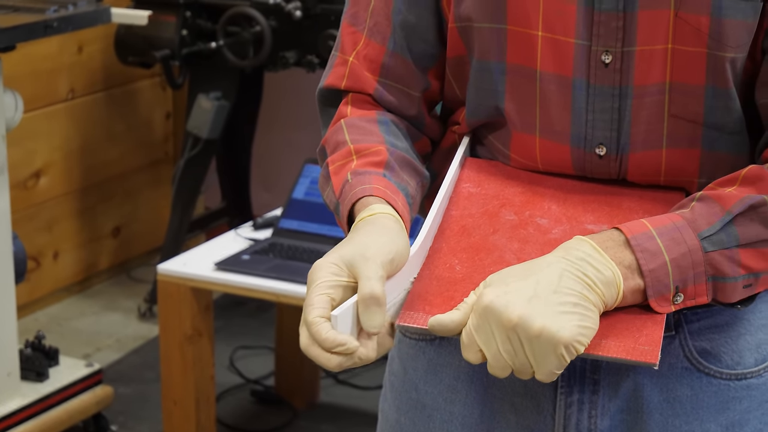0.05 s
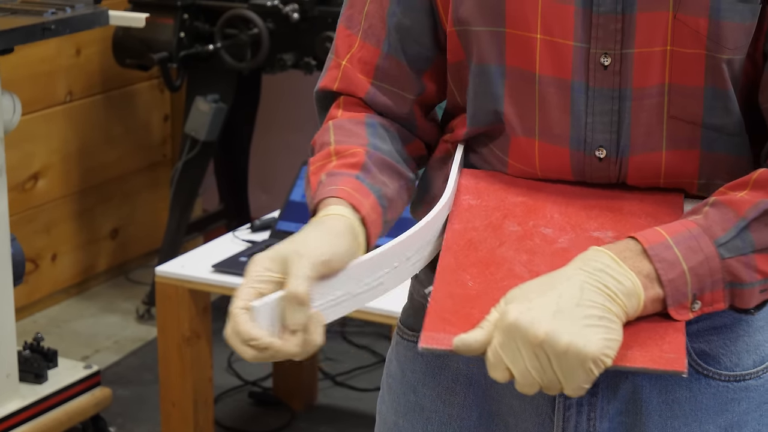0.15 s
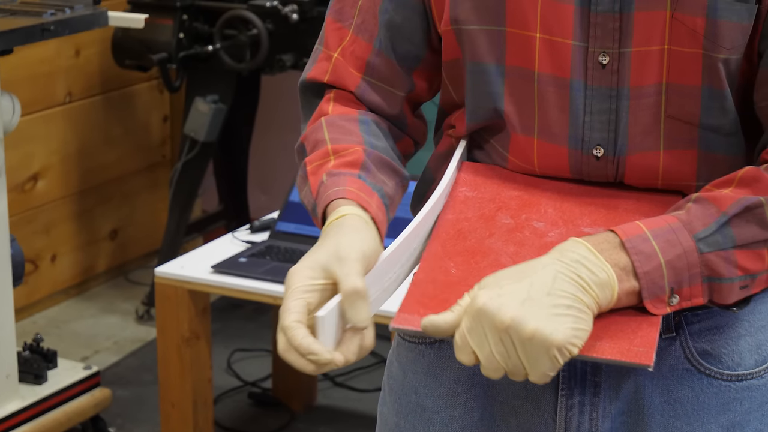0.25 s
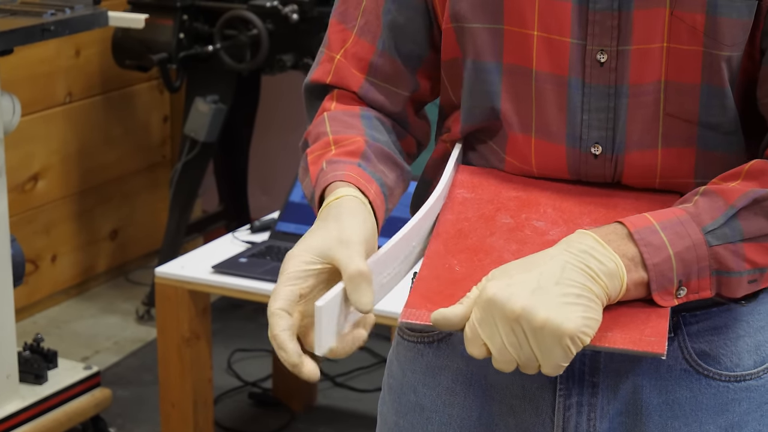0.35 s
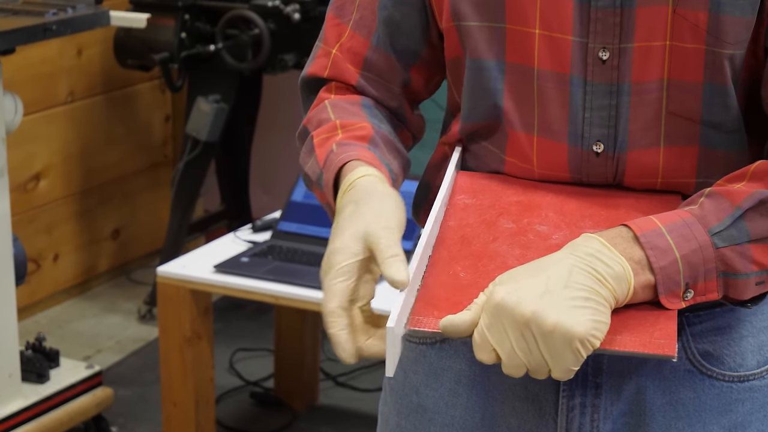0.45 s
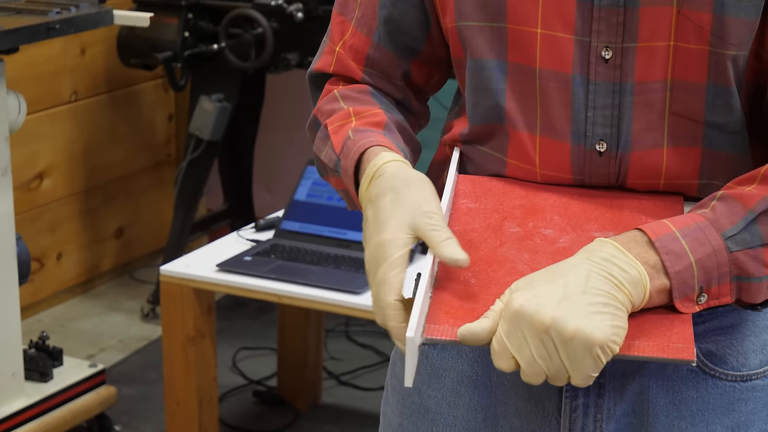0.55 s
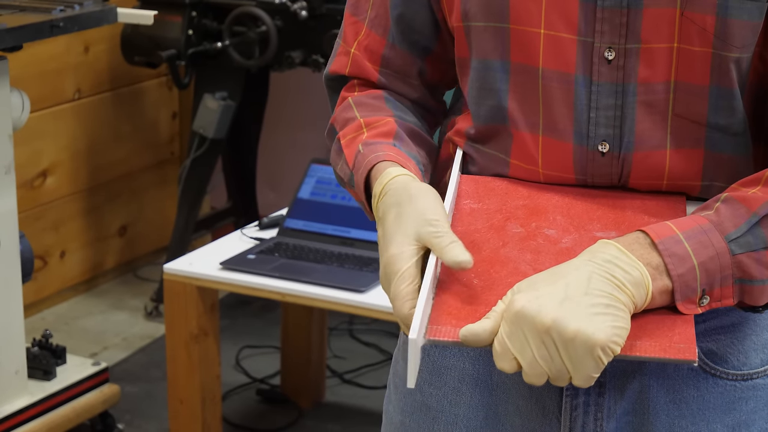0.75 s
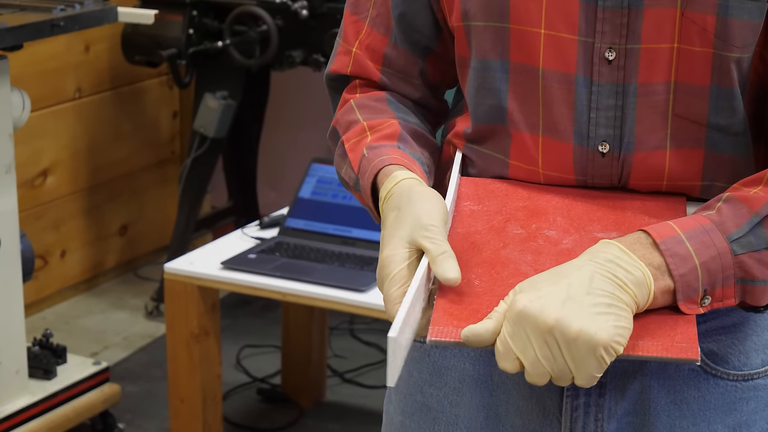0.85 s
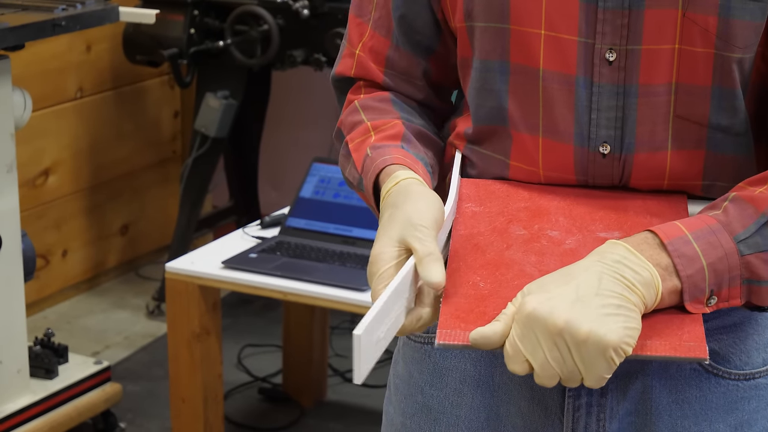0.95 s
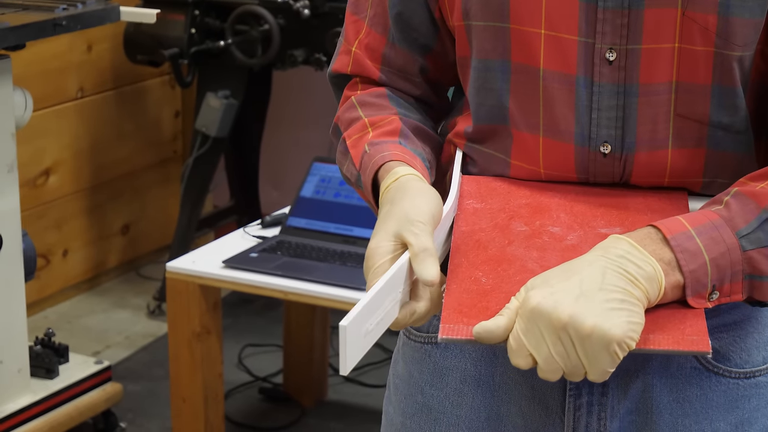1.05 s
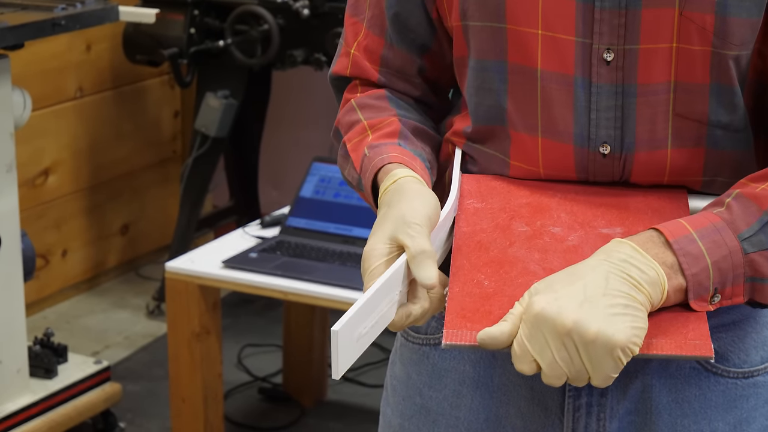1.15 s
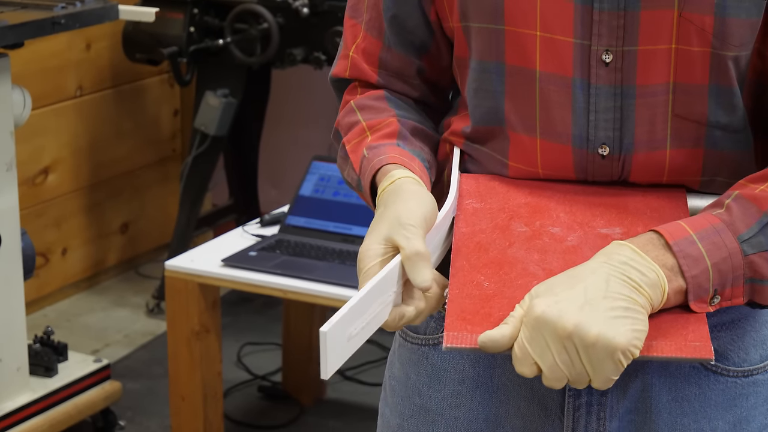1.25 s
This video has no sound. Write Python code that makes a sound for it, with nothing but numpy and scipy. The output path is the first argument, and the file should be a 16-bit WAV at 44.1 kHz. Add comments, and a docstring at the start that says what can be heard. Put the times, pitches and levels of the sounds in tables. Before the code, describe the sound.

A brittle plastic snap: hardened glue crackles, then breaks loudly from a stiff panel, close up.

```python
"""In a small workshop, a plastic strip is bent away from a cured resin panel, close to the microphone.
The hot glue between them crackles, then lets go in a volley of snaps that overload the recorder.
The snaps are short noise bursts with falling chirps, and they ring the panel as dying, wavering tones.
The strip rubs (grains of noise) and ticks (small bursts) on the panel, faintly before the snaps and more
after; soft knocks (dying sines) follow them. Room echoes, faint air and a low rumble surround it all."""
import sys
import numpy as np
from scipy import signal
from scipy.fft import rfft, irfft
from scipy.io import wavfile

SR = 44100
rng = np.random.default_rng(int(sys.argv[2]) if len(sys.argv) > 2 else 0)


def digitize_waveform(pressure):
    """Quantize a signal to 16-bit integers and store it at the path in sys.argv[1].

    Rows of a 2-D input are taken as channels; values are limited to [-1, 1].
    """
    field = np.atleast_2d(pressure).T
    bounded = np.clip(field, -1, 1)
    quanta = np.round(bounded * 32767).astype(np.int16)
    wavfile.write(sys.argv[1], SR, quanta)


N = 57330  # length in samples, 1.3 s


def amp(db):
    """Turns decibels into a gain."""
    return 10 ** (np.asarray(db) / 20)


def unit(x):
    """Scales a sound to an rms of 1."""
    return x / np.sqrt(np.mean(x ** 2) + 1e-20)


def read(points, hz):
    """Reads a table of (pitch, value) between its points, along log frequency."""
    table_hz, value = np.transpose(points)
    return np.interp(np.log(hz + 1), np.log(table_hz + 1), value)


def add(mix, start_s, sound):
    """Mixes a sound in at its start time, cutting off what runs past the end."""
    part = mix[max(round(start_s * SR), 0):][:len(sound)]
    part += sound[:len(part)]


def colour(x, points, size=4096):
    """Gives a sound the table's tone colour, with a filter of unit energy that never sounds early."""
    log_gain = np.log(amp(read(points, abs(np.fft.fftfreq(size, 1 / SR)))))
    # the phase that puts the energy as early as possible
    spectrum = np.exp(np.conj(signal.hilbert(log_gain)))
    taps = np.fft.ifft(spectrum).real[:size // 2]
    return signal.fftconvolve(x, taps / np.linalg.norm(taps))[:len(x)]


def noise(points):
    """Makes steady noise of rms 1 with the table's tone colour."""
    gain = amp(read(points, np.fft.rfftfreq(N, 1 / SR)))
    return unit(irfft(rfft(rng.standard_normal(N)) * gain, N))


def drift(limit_hz=22):
    """Makes a slow random wander of rms 1, with little above the limit."""
    smoothing = np.exp(-(np.fft.rfftfreq(N, 1 / SR) / limit_hz) ** 2)
    return unit(irfft(rfft(rng.standard_normal(N)) * smoothing, N))


def burst(decay_s, size=1024, count=4):
    """Makes a quickly dying burst of noise with a nearly even spectrum."""
    fade = np.exp(-np.arange(size) / SR / decay_s)
    x = rng.standard_normal(size) * fade
    # flatten the spectrum, then quieten the end again
    for _ in range(count):
        z = rfft(x)
        x = irfft(z / (abs(z) + 1e-12)) * np.minimum(2 * np.sqrt(fade), 1)
    # as much energy as 3 ms of sound at rms 1
    return x / np.linalg.norm(x) * np.sqrt(.003 * SR)


SCATTER_DB, SCATTER_DECAY_S = -15, .007  # scatter level compared with its click


def clicks(table, shapes):
    """Each click mixes body, edge and fizz, plus its own quick scatter off hands and clothes."""
    parts = np.zeros((3, N))
    for start_s, decay_s, *levels_db in table:
        for part, level_db in zip(parts, levels_db):
            add(part, start_s, amp(level_db) * burst(decay_s))
            add(part, start_s, amp(level_db + SCATTER_DB) * burst(SCATTER_DECAY_S, size=2048))
    return sum(colour(part, shape) for part, shape in zip(parts, shapes))


def ring(modes):
    """Adds up half a second of dying sines; each falls by 60 dB in its t60."""
    t = np.arange(SR // 2) / SR
    out = np.zeros(len(t))
    for pitch_hz, level_db, t60_s in modes:
        fade = np.exp(-np.log(1000) * t / t60_s)
        out += amp(level_db) * fade * np.sin(2 * np.pi * pitch_hz * t)
    return out


# tone colour of the still air: pitch_hz, relative_db (per Hz)
AIR_COLOUR = [(20, 3), (100, 1), (400, -3.5), (1000, -7.5), (3000, -11.5), (8000, -15), (16000, -18)]
# tone colour of the low rumble: pitch_hz, relative_db (per Hz)
RUMBLE_COLOUR = [(8, -4.5), (25, 9), (40, -0.5), (70, -10), (150, -33), (600, -69.5)]
# how the rumble swells and sinks: time_s, level_db
RUMBLE_LEVEL = [(0, -61), (.4, -52), (.8, -62), (1.0, -57), (1.12, -49), (1.3, -63)]
AIR_DB = -63.5


def background():
    """Faint room air is steady noise, over low noise whose level slowly swells and sinks."""
    rumble_db = np.interp(np.arange(N) / SR, *np.transpose(RUMBLE_LEVEL))
    return amp(AIR_DB) * noise(AIR_COLOUR) + amp(rumble_db) * noise(RUMBLE_COLOUR)


# strokes of the strip along the edge: peak_s, rise_s, fall_s, hollow_db, scrape_db, fizz_db
STROKES = [(.005, .02, 0.056, -66, -57.5, -65), (0.452, 0.062, 0.041, -55, -50, -65),
           (0.553, 0.028, 0.02, -49, -45, -47), (.628, 0.023, .02, -59, -58, -54.5),
           (.702, 0.01087, .05, -64, -65, -75), (0.782, 0.0037, .015, -54, -66.5, -79),
           (0.826, 0.028, 0.055, -56.5, -58.5, -61.5), (.92, 0.036, 0.031, -68, -75, -74),
           (0.974, 0.019, 0.037, -61, -66, -71), (1.012, .014, 0.0088, -50.5, -70, -58),
           (1.11, .04, 0.039, -64, -77, -72)]
# tone colour of the hollow part of a rub: pitch_hz, relative_db
RUB_HOLLOW = [(60, -10), (150, 3.5), (330, 3), (600, 1), (1000, -5.5), (1600, -16.5), (6000, -40.5)]
# tone colour of the scraping part: pitch_hz, relative_db
RUB_SCRAPE = [(60, -22.5), (600, -12.5), (1200, -0.5), (2600, 4), (3300, -5), (4600, -2.5), (6000, -16.5),
              (15000, -30.5)]
# tone colour of the fizzing part: pitch_hz, relative_db
RUB_FIZZ = [(60, -38), (4000, -20), (6000, -2.5), (8500, -4.5), (10000, 2), (15500, 1.5)]
GRAINS_PER_S, GRAIN_SPREAD_DB = 11000, 3  # how many slips, and how unequal they are


def rubs():
    """Each stroke is made of dense tiny slips, grains of noise that swell and fade together."""
    t, out = np.arange(N) / SR, np.zeros(N)
    grains = rng.standard_normal((3, N))
    strength = amp(GRAIN_SPREAD_DB * np.minimum(rng.exponential(1, N), 4))
    slip_happens = rng.random(N) < GRAINS_PER_S / SR
    slips = grains * strength * slip_happens
    shapes = (RUB_HOLLOW, RUB_SCRAPE, RUB_FIZZ)
    parts = np.array([unit(colour(x, shape)) for x, shape in zip(slips, shapes)])
    for peak_s, rise_s, fall_s, *levels_db in STROKES:
        before = ((peak_s - t) / rise_s) ** 2
        after = (t - peak_s) / fall_s
        stroke = np.exp(-np.where(t < peak_s, before, after))
        out += stroke * (amp(levels_db) @ parts)
    return out


# the strip ticks on the panel: start_s, decay_s, body_db, edge_db, fizz_db
TICKS = [(.007, 0.0018, -51.5, -78, -57), (.449, 0.0009, -65.5, -47, -49), (.485, 0.0037, -51.5, -60, -48),
         (.5008, 0.0012, -54, -51, -52), (.5318, 0.00043, -53, -62, -60), (.546, 0.00095, -43.5, -70, -63),
         (.5568, 0.0016, -58, -47.5, -65), (.5628, 0.0019, -40, -48, -68), (.781, 0.00091, -64.5, -66, -65),
         (.8903, 0.0012, -74, -55.5, -59), (.9883, 0.00035, -48.5, -41.5, -43.5),
         (1.0068, 0.0022, -53.5, -52, -53), (1.011, 0.0026, -45.5, -50.5, -48),
         (1.027, 0.0036, -65, -55, -56)]
# tone colour of a click's low body: pitch_hz, relative_db
BODY = [(30, -20.5), (150, -4.5), (400, -4), (800, 0.5), (1450, 0.5), (2200, -1.5), (3000, -17),
        (6000, -42)]
# tone colour of the edge of a strip tick: pitch_hz, relative_db
STRIP_EDGE = [(30, -56.5), (1300, -22), (2000, -4.5), (2450, 4.5), (3300, -7), (4000, 0), (5200, -11),
              (9000, -35.5)]
# tone colour of a click's high fizz: pitch_hz, relative_db
FIZZ = [(30, -44.5), (3500, -23.5), (5500, 0), (8000, -1.5), (10500, -0.5), (13500, -3), (16000, -4.5)]


def ticks():
    """The strip ticks on the panel in small clicks, each a short burst of coloured noise."""
    return clicks(TICKS, (BODY, STRIP_EDGE, FIZZ))


# the glue breaks: start_s, decay_s, body_db, edge_db, fizz_db
CRACKS = [(.0772, .0004, -62.5, -61, -57), (.1107, .0016, -52.5, -41, -41.5),
          (.1284, .0009, -31.5, -40, -46.5), (.1348, .0012, -36, -37, -40), (.1556, .001, -47.5, -46, -43),
          (.1632, .001, -38, -41.5, -46), (.1784, .0008, -36.5, -39, -31), (.1859, .001, -39.5, -40.5, -34),
          (.1893, .001, -46, -39, -43), (.1924, .0015, -41, -44, -36.5), (.1955, .0012, -31.5, -36.5, -40),
          (.2037, .001, -35, -31.5, -30), (.2109, .0012, -2.5, -9.5, -9.5),
          (.2195, .0016, -14.5, -14.5, -17), (.2231, .001, -11, -11.5, -13.5),
          (.2314, .0015, -14.5, -8, -10.5), (.2346, .0012, -14.5, -14, -19.5),
          (.2456, .0007, -19, -13, -14.5), (.2473, .0014, -12, -10.5, -13), (.2487, .0018, -13, -11.5, -15),
          (.253, .002, -23.5, -23.5, -27), (.2611, .0008, -21, -14.5, -17)]
# tone colour of the sharp edge of a glue crack: pitch_hz, relative_db
CRACK_EDGE = [(30, -49.5), (1200, -21.5), (2500, -2), (3500, 3), (4600, 2), (5400, -12.5), (9000, -39)]


def cracks():
    """Each glue fracture frees its energy in a short burst of coloured noise."""
    return clicks(CRACKS, (BODY, CRACK_EDGE, FIZZ))


# tones the panel can ring at: pitch_hz, relative_db
PANEL_MODES = [(352, -52.5), (453, -54.5), (571, -42), (960, -48.5), (1146, -46), (1385, -43.5),
               (1472, -41), (1535, -43), (1840, -51), (1980, -47.5), (2090, -49.5), (2592, -45.5),
               (2997, -45.5), (3410, -47)]
RING_T60_S, RING_T60_SLOPE = 0.27, 0.36  # time to fall 60 dB at 1 kHz; higher tones die sooner
RING_WAVER_HZ, RING_FLUTTER = 5.24, .25  # rms wander of pitch, and of loudness as a share


def panel(blows):
    """Each mode of the hand-held panel stores the energy of the blows and lets it go unsteadily."""
    power, out = colour(blows, BODY) ** 2 / 10, np.zeros(N)
    for pitch_hz, level_db in PANEL_MODES:
        t60_s = RING_T60_S * (pitch_hz / 1000) ** -RING_T60_SLOPE
        # energy piles up with each blow and leaks away
        kept = np.exp(-2 * np.log(1000) / t60_s / SR)
        stored = signal.lfilter([1], [1, -kept], power)
        wavering_hz = pitch_hz + RING_WAVER_HZ * drift()
        tone = np.sin(2 * np.pi * np.cumsum(wavering_hz) / SR)
        flutter = 1 + RING_FLUTTER * drift()
        out += amp(level_db) * np.sqrt(stored) * tone * flutter
    return out


# bending waves as the panel springs free: start_s, chirp_db, push_db
BENDS = [(0.2107, 9.5, -13.5), (.2229, 1.5, -29.5), (0.2315, -0.5, -25.5)]
BEND_TOP_HZ, BEND_END_HZ, BEND_GLIDE_S = 3420, 1272, 0.0011
BEND_RISE_S, BEND_DECAY_S, PUSH_S = 0.00025, 0.0018, .001


def bends():
    """High bending waves arrive first, so each release is a very fast falling chirp with a low push of air."""
    t, out = np.arange(SR // 20) / SR, np.zeros(N)
    pitch_hz = BEND_END_HZ + (BEND_TOP_HZ - BEND_END_HZ) * np.exp(-t / BEND_GLIDE_S)
    swell = (1 - np.exp(-t / BEND_RISE_S)) * np.exp(-t / BEND_DECAY_S)
    chirp = np.sin(2 * np.pi * np.cumsum(pitch_hz) / SR) * swell
    push = (1 - t / PUSH_S) * np.exp(-t / PUSH_S)
    for start_s, chirp_db, push_db in BENDS:
        add(out, start_s, amp(chirp_db) * chirp + amp(push_db) * push)
    return out


# soft knocks of strip and hand on the panel: start_s, thud_db, ring_db, ring_pitch_ratio
KNOCKS = [(.485, -38.5, -39.5, 0.97), (0.507, -47.5, -39, 0.82), (0.547, -44, -71, 0.54),
          (.5625, -33.5, -28.5, 0.97), (1.006, -45, -40, .6), (1.015, -46, -66, 0.64)]
# low tones of a knock: pitch_hz, relative_db, t60_s
THUD = [(96.2, -2, 0.17), (150.6, 4.5, 0.064), (180, -4.5, 0.023)]
# hollow tones of a knock, before the pitch ratio: pitch_hz, relative_db, t60_s
KNOCK_RING = [(470, -12.5, 0.25), (533, -17.5, 0.085), (573, 2.5, 0.052), (640, -26, 0.081)]
KNOCK_RISE_S = 0.0018


def knocks():
    """Soft blows give a low thud and a hollow ring whose pitch depends on where the strip lands."""
    out, thud = np.zeros(N), ring(THUD)
    rise = 1 - np.exp(-np.arange(len(thud)) / SR / KNOCK_RISE_S)
    for start_s, thud_db, ring_db, ratio in KNOCKS:
        hollow = ring([(pitch_hz * ratio, level_db, t60_s) for pitch_hz, level_db, t60_s in KNOCK_RING])
        add(out, start_s, rise * (amp(thud_db) * thud + amp(ring_db) * hollow))
    return out


def even_noise(size=2048, count=3):
    """Makes one second of noise with no pitch standing out, by levelling its spectrum again and again."""
    x = rng.standard_normal(SR)
    for _ in range(count):
        z = signal.stft(x, nperseg=size)[2]
        x = signal.istft(z / (abs(z) + 1e-12), nperseg=size)[1][:SR]
    return x


# how long the room rings at each pitch: pitch_hz, t60_s
ROOM_T60 = [(100, 0.49), (400, 0.39), (1400, .57), (2800, 0.39), (5000, .41), (9000, 0.3), (15000, 0.29)]
# tone colour of the room: pitch_hz, relative_db
ROOM_COLOUR = [(60, -8), (200, -5), (400, -1), (570, 3.5), (780, -1.5), (1150, -1.5), (1480, 1.5),
               (2000, -5), (2500, -1), (4500, -2.5), (9000, 7), (15000, -5)]
# first echoes: delay_s, gain
ECHOES = [(.0042, 0.068), (.0071, .08), (0.0153, .08)]
ROOM_DB, ROOM_BUILD_S = -10, 0.0046  # energy of the tail, and how fast it builds up


def room_response():
    """The room answers a click with a few echoes and a short blurred tail."""
    hz, time_s, z = signal.stft(even_noise(), SR, nperseg=256)
    fade = np.exp(-np.log(1000) * time_s / read(ROOM_T60, hz)[:, None])
    tail = signal.istft(z * fade, SR, nperseg=256)[1][:SR]
    build = 1 - np.exp(-np.arange(SR) / SR / ROOM_BUILD_S)
    tail = colour(tail * build, ROOM_COLOUR)
    response = amp(ROOM_DB) * tail / np.linalg.norm(tail)
    for delay_s, gain in ECHOES:
        add(response, delay_s, np.array([gain]))
    return response


def workshop(x, cycle_hz=12, count=3):
    """The sound feeds three differently scattered room tails in steadily changing shares, for a smooth blur."""
    cycle = 2 * np.pi * cycle_hz * np.arange(N) / SR
    out = x.copy()
    for k in range(count):
        share = np.cos(cycle + np.pi * k / count) * np.sqrt(2 / count)
        out += signal.fftconvolve(x * share, room_response())[:N]
    return out


KNOCK_ROOM_SHARE = 0.64  # the rest of each knock skips the room


def scene():
    """Only the breaking glue sets the panel ringing; part of each knock is heard without the room."""
    breaking = cracks() + bends()
    handling = ticks() + rubs()
    blows = knocks()
    in_room = workshop(breaking + handling + KNOCK_ROOM_SHARE * blows)
    close_up = (1 - KNOCK_ROOM_SHARE) * blows + panel(breaking)
    return (in_room + close_up + background())[None]


CLIP_LEVEL, TOP_HZ = 1.0, 15850


def record(dry):
    """The snaps overload the input, which flattens their peaks; then the highest treble is cut."""
    clipped = np.clip(dry, -CLIP_LEVEL, CLIP_LEVEL)
    low_pass = signal.firwin(511, TOP_HZ, window=("kaiser", 9), fs=SR)
    return signal.oaconvolve(clipped, low_pass[None], "same")


dry = scene()
out = record(dry)
digitize_waveform(out)
```